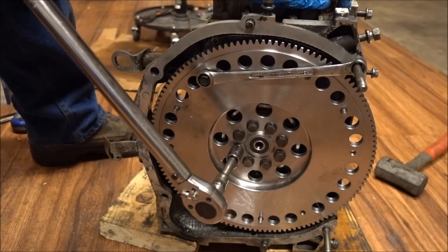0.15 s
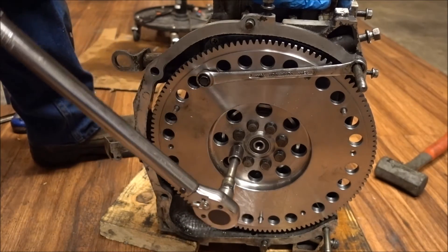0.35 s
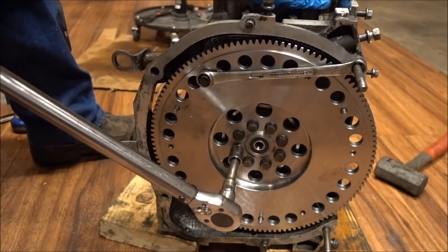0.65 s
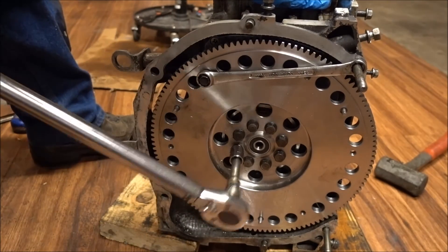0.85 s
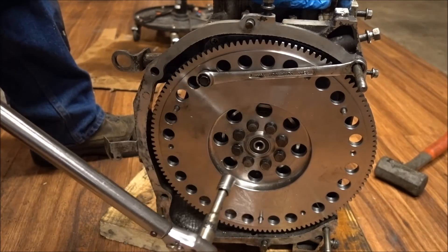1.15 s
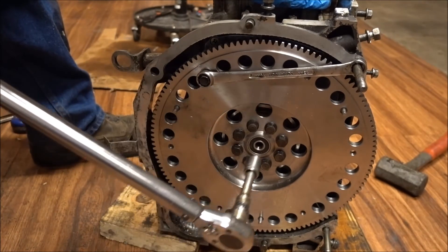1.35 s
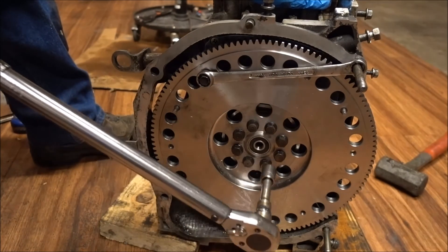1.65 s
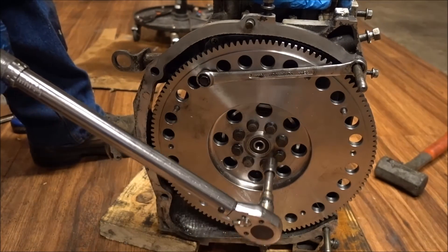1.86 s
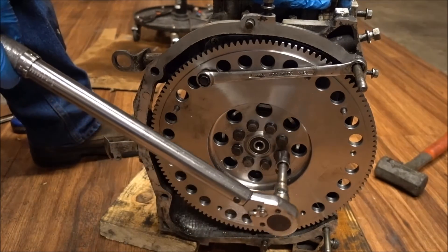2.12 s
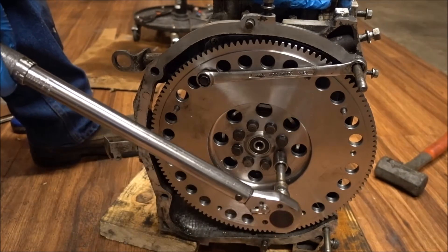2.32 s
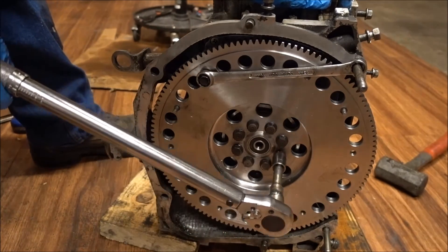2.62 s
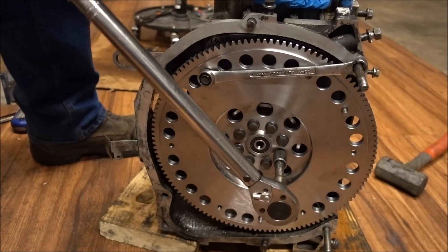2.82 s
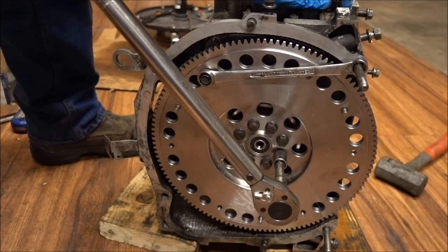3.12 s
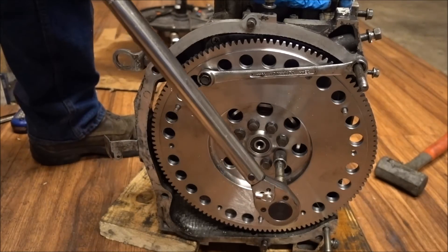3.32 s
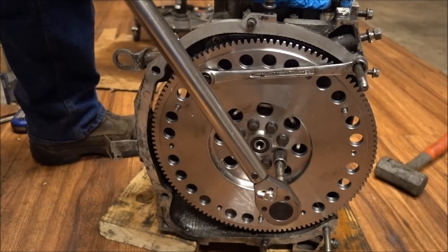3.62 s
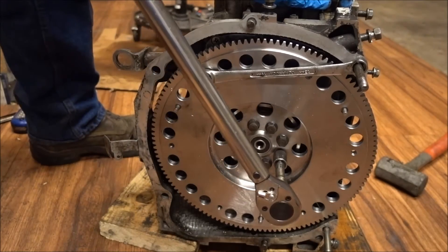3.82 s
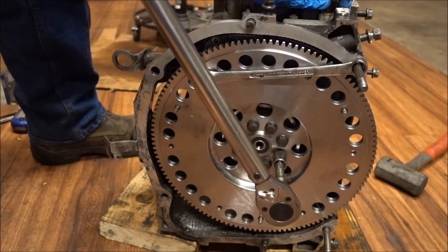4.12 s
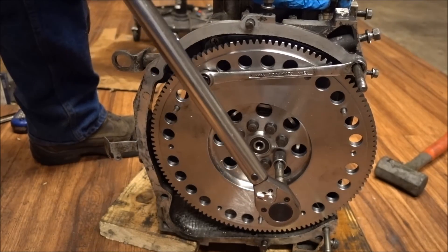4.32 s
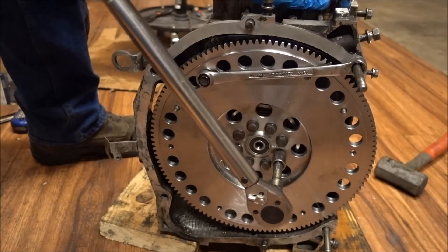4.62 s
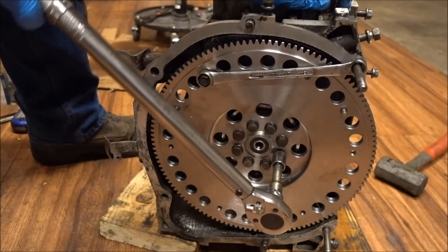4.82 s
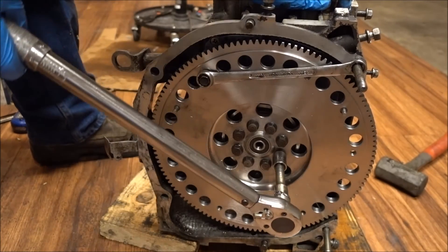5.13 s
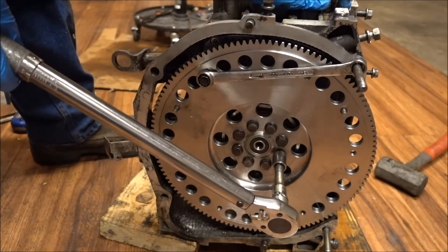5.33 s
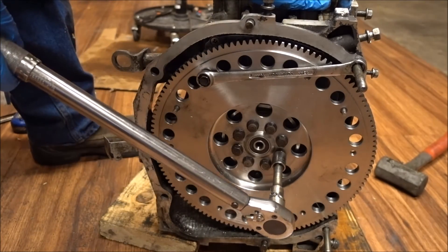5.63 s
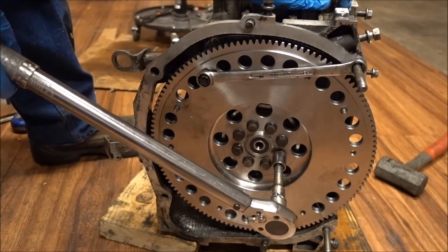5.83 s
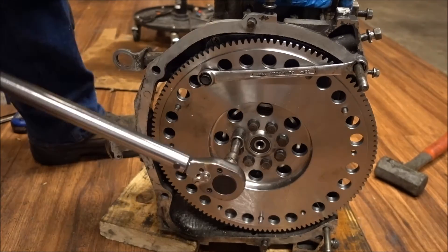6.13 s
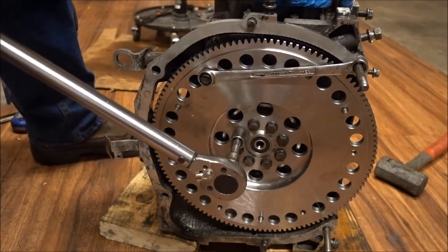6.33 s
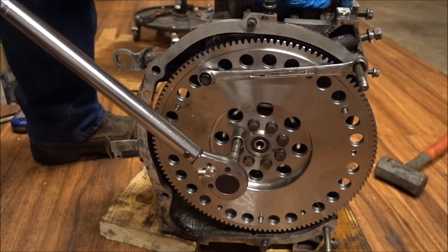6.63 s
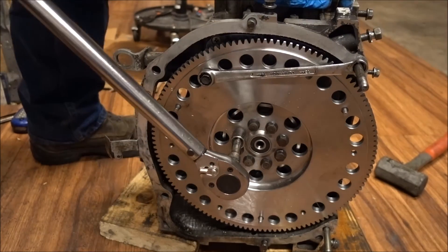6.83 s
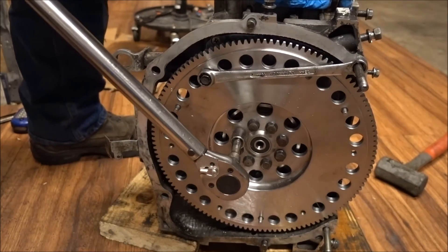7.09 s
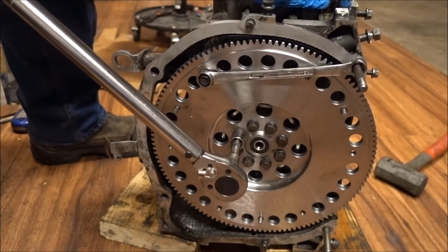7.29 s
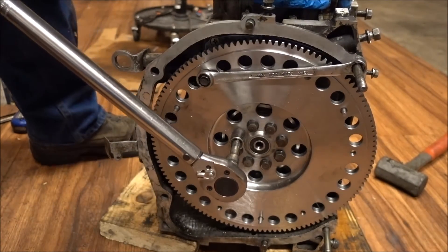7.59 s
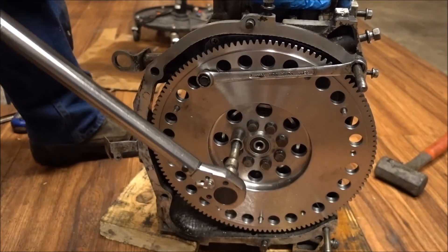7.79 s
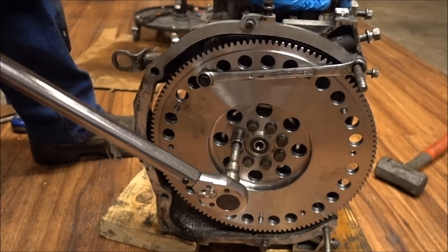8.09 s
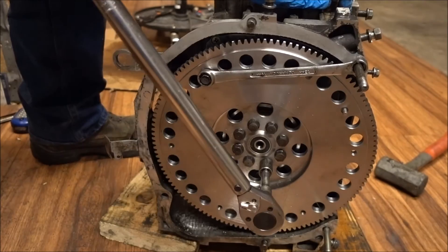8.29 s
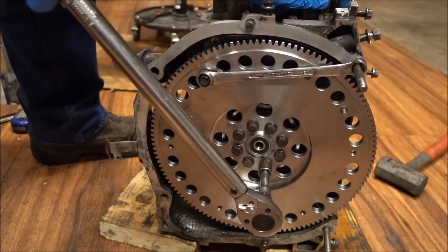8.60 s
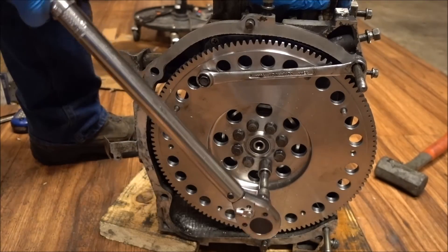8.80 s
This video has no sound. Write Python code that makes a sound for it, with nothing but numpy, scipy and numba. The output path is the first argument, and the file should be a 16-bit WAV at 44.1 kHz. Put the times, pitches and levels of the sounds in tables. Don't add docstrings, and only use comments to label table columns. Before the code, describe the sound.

Irregular metallic taps, a bright ringing clink, and three hard click-clack pairs from a torque wrench on an engine flywheel in a humming workshop.

```python
import sys
import numpy as np
from scipy import signal
from scipy.fft import rfft, irfft, next_fast_len
from scipy.io import wavfile
from scipy.ndimage import uniform_filter1d
from numba import njit

SR = 44100
rng = np.random.default_rng(int(sys.argv[2]) if len(sys.argv) > 2 else 0)


def transcribe(signal):
    frames = np.atleast_2d(signal).T
    limited = np.clip(frames, -1, 1)
    pcm = np.round(limited * 32767).astype(np.int16)
    wavfile.write(sys.argv[1], SR, pcm)


def rack_gain(trim_db):
    fader = np.asarray(trim_db, float)
    return 10 ** (fader / 20)


N = 394694

# (frequency [Hz], level [dB], t60 [s])
LEFTOVER = [(5916, -3, .8)]
NUDGE = [(3542, 0, .7), (10160, 2, .05), (1300, 2, .08)]
CLINK = [(797, -29, 5.0), (1502, -21, 1.5), (2299, -21, 0.4), (3106, -25, 0.25), (3542, -3, 0.64),
         (5149.8, -13, 0.4), (5157, -5, 0.36), (5916, -27, 0.99), (6745, -5, 0.2), (7095, -15, 0.4),
         (8312, -44, 0.43), (9065, -21, 0.38), (9141, -16, 0.67), (9889, -23, 0.32), (10160, -6, 0.27),
         (11070, -27, 0.25), (11940, -30, 0.56), (12670, -28, 0.23), (12850, -23, 0.3), (13030, -24, 0.36),
         (13740, -20, 0.14), (15140, -40, 0.23), (15570, -38, 0.35)]
TAP_1 = [(680, -6, 0.15), (1292, -6, 0.13), (3128, -6, 0.13), (3542, 0, 0.9), (5157, -5, 1.2),
         (5922, -19, 1.0), (6745, -14, 0.34), (7456, -37, 5.0), (9141, -24, 5.0), (10950, -25, 0.32),
         (12660, -17, 0.13)]
TAP_2 = [(199, -9, 0.17), (1502, -28, 0.96), (3542, 0, 0.63), (3811, -14, 0.27), (5922, -23, 0.6),
         (6740, -11, 0.31), (7456, -25, 0.55), (8947, -8, 0.19), (9141, -27, 0.73), (10160, -30, 0.45),
         (10950, -20, 0.24), (12650, -21, 0.23)]
TAP_3 = [(200, 0, .15), (680, 2, .15), (2550, 10, .035), (3542, -14, .5), (5157, -14, .25), (5922, -22, .4),
         (6745, -14, .25)]
SEAT = [(200, 4, .12), (680, 0, .15), (3542, -12, .6)]
BLIP = [(2550, 0, .035)]
SLIP = [(680, 0, .12), (1250, 0, .12), (1790, 3, .1), (3547, 0, .6), (5157, -3, .6)]
BREAK_1 = [(554, -12, 2.4), (697, -18, 0.3), (1087, -17, 2.2), (1206, -24, 0.4), (1486, -24, 2.8),
           (1626, -27, 5.0), (3273, -1, 0.18), (3546, 2.5, 0.36), (3559, -5, 0.25), (4899, -26, 0.82),
           (5157, -24, 0.97), (5916, -30, 2.0), (7058, -21, 0.4), (9146, -23, 0.63), (11110, -16, 0.61),
           (11950, -20, 0.13)]
RESET_1 = [(554, -5, 0.5), (697, -12, 0.2), (1206, 1, 0.25), (1637, -4, 0.22), (2293, -16, 0.32),
           (2900, -2, 0.13), (3138, -15, 0.38), (3548, -19, 0.45), (4183, -15, 0.31), (4565, -15, 0.75),
           (5157, -9, 0.75), (5916, -20, 0.6), (7477, -19, 0.4), (9146, -17, 0.88), (11110, -21, 0.38)]
BREAK_2 = [(554, -20, 5.0), (1087, -28, 5.0), (1836, -19, 0.31), (2293, -17, 0.67), (3305, -5, 0.2),
           (3548, -3, 0.5), (3560, -10, 0.3), (4172, -19, 0.27), (4899, -25, 0.58), (5157, -22, 0.56),
           (5922, -27, 1.0), (6821, -25, 0.32), (9146, -24, 0.85), (11110, -20, 0.16)]
RESET_2 = [(1087, -10, 0.3), (1486, -8, 0.7), (2536, -13, 0.3), (2767, -12, 0.3), (3327, -12, 0.3),
           (3550, -4, 0.35), (4404, -6, 0.22), (4565, -14, 0.75), (4960, -2, 0.22), (5135, -12, 0.3),
           (5157, -11, 0.38), (5916, -11, 0.45), (7127, -23, 0.56), (9082, -16, 0.44), (9146, -21, 0.75),
           (11110, -13, 0.41), (11620, -12, 0.13), (11940, -26, 0.4), (15580, -28, 0.23), (556, -12, .5),
           (1637, -3, .22)]
BREAK_3 = [(554, -21, 3.8), (1087, -15, 0.3), (1626, -34, 2.1), (2293, -29, 0.72), (3273, -15, 0.24),
           (3553, 0, 0.42), (4899, -27, 0.77), (5922, -25, 0.92), (7111, -19, 0.37), (9146, -25, 0.6),
           (11120, -47, 5.0), (14930, -36, 0.21), (15590, -40, 0.32)]
RESET_3 = [(554, -12, 0.5), (697, -20, 0.2), (1082, -19, 0.33), (3138, -17, 0.35), (3496, -14, 0.2),
           (3553, -2, 0.43), (4167, -17, 0.23), (4737, -18, 0.29), (5133, -15, 0.35), (5157, -12, 0.62),
           (5922, -28, 0.92), (7106, -24, 0.31), (9076, -25, 0.31), (10330, -31, 0.2), (12870, -36, 0.28),
           (14930, -42, 0.33), (15590, -27, 0.16), (1206, -8, .25), (1630, -11, .16)]

TAP, KNOCK, OVER, BACK, DULL, SKID = range(6)
TUBE, ALL = 1300, 20000
UNLIKE_HZ = 5000

# ((time [s], clatter level [dB], ring level [dB], contact [ms], muted at [s]),
#         modes, kind of contact, modes muted below [Hz])
BLOWS = [((.001, -90, -62, 1.1, .5), LEFTOVER, TAP, ALL), ((.7277, -21, -52, 1.5, .95), NUDGE, TAP, TUBE),
         ((.8385, -14.5, -52, 1.5, 1.01), NUDGE, TAP, ALL), ((1.016, 11, -6, 34.0, 1.9), CLINK, KNOCK, ALL),
         ((1.918, -14, -39, 2.5, 2.075), TAP_1, TAP, ALL), ((2.0755, -6, -30, 1.5, 2.277),
         TAP_2, TAP, TUBE), ((2.2832, -16, -38, 1.5, 2.6), TAP_3, DULL, ALL),
         ((2.6209, -34, -47, 2.5, 2.712), SEAT, DULL, ALL), ((2.709, -60, -42, 1.5, 2.8), BLIP, DULL, ALL),
         ((3.9414, 12, -17, 12.0, 4.188), BREAK_1, OVER, ALL), ((4.2018, 15, -17, 2.5, 4.395),
         RESET_1, BACK, TUBE), ((6.0975, -11, -46, 6.0, 6.188), SLIP, SKID, ALL),
         ((6.8284, 14, -12, 6.0, 7.149), BREAK_2, OVER, ALL), ((7.1596, 16.5, -17, 2.5, 7.27),
         RESET_2, BACK, TUBE), ((8.1908, 13, -11, 1.5, 8.45), BREAK_3, OVER, ALL),
         ((8.4562, 16, -11, 2.5, 8.635), RESET_3, BACK, TUBE)]


def wrench():
    # (frequency [Hz], level [dB])
    socket = [(100, -16), (200, -6), (700, -4), (1300, -1), (3500, 0), (6000, -6), (10000, -11),
              (15500, -19), (16500, -40)]
    dull_socket = [(100, -14), (200, -4), (700, -1), (1300, 0), (2600, 0), (4000, -6), (6000, -14),
                   (10000, -22), (16500, -45)]
    bar = [(200, -26), (600, -18), (1500, -7), (3500, 0), (7000, -1), (10000, -3), (13000, -6),
           (15500, -12), (16500, -40)]
    pawl_over = [(60, -17), (200, -8), (500, -12), (1000, -15), (1800, -1), (2500, -4), (3300, 0),
                 (4300, -3), (5300, -9), (7000, -8), (11000, -12), (15600, -16), (16500, -40)]
    pawl_back = [(60, -13), (110, -3), (300, -19), (800, -16), (1200, -7), (1620, -4), (2100, -6),
                 (3000, -1), (4500, -3), (6000, -6), (8000, -10), (15600, -19), (16500, -40)]
    # (frequency [Hz], width [Hz], level [dB])
    block_seated = [(200, 30, 1.2), (680, 70, 4), (1250, 70, 0), (1800, 110, 0), (2580, 100, 1),
                    (3130, 90, 3)]
    block_free = [(3130, 90, 2), (4220, 130, 2), (6900, 400, 3)]
    block_over = [(200, 30, 1), (700, 25, 8), (1210, 30, 3), (1840, 70, 3), (2150, 30, 6), (2400, 50, 5),
                  (2880, 80, 2), (3060, 30, 6), (3140, 30, 7), (3310, 35, 9), (4250, 120, 6),
                  (4900, 100, 0), (6900, 400, 3)]
    block_back = [(200, 30, -8), (694, 25, 10), (1090, 20, 6), (1210, 25, 6), (1640, 50, 8), (2550, 40, 6),
                  (2780, 30, 6), (2910, 30, 4), (3140, 35, 7), (3310, 35, 6), (3930, 35, 3), (4170, 30, 8),
                  (4390, 45, 5), (4900, 90, 3), (5560, 45, 1), (6900, 400, 2)]
    # (frequency [Hz], left leads [rad], left minus right [dB])
    lobes_seated = [(555, 0, 0), (1150, -.4, 1), (1490, -.1, -1), (2293, -.5, 0), (3548, .15, -1),
                    (5157, -1.6, 1), (5918, -.8, -1.5), (9144, -1.3, 0), (15000, -1.3, 0)]
    lobes_free = [(800, 0, 0), (1500, -.2, 0), (2299, -.6, -3), (3542, -.6, 9), (5157, -1.9, -4),
                  (5916, -.4, -2), (9141, -1.4, 0), (15000, -1.4, 0)]
    kinds = {TAP: (socket, -6, block_seated, lobes_seated),
             KNOCK: (bar, -33, block_free, lobes_free),
             OVER: (pawl_over, -23, block_over, lobes_seated),
             BACK: (pawl_back, -26, block_back, lobes_seated),
             DULL: (dull_socket, -8, block_seated, lobes_seated),
             SKID: (socket, -14, block_seated, lobes_seated)}
    hard_db = -25
    rattle_ms, rattle_share, rattle_db = 22, .012, -7

    cracks, clatter, rings = np.zeros((3, 2, N))
    for (s, clatter_db, ring_db, contact_ms, muted_s), modes, kind, muted_hz in BLOWS:
        colour, crack_db, clusters, lobes = kinds[kind]
        add(cracks, s, rack_gain(clatter_db + crack_db) * crack(min(contact_ms, 4.0), colour))

        push = shape(signal.unit_impulse(2048, 40), colour)
        struck_db = 1.5 * rng.standard_normal(len(clusters))
        push = push + sum(rack_gain(db + more) * band(push, hz, width)
                          for (hz, width, db), more in zip(clusters, struck_db))
        t = np.arange(4096) / SR
        hits = rng.standard_normal(len(t)) * (rng.random(len(t)) < rattle_share)
        rebounds = rack_gain(rattle_db) * hits * np.exp(-1e3 * t / rattle_ms)
        push = signal.fftconvolve(push, signal.unit_impulse(len(t)) + rebounds)
        add(clatter, s, rack_gain(clatter_db) * push / np.sqrt(np.sum(push ** 2)))

        sung = ring(modes, ring_db > hard_db, contact_ms, muted_s - s, muted_hz, lobes)
        add(rings, s, rack_gain(ring_db) * sung)
    return cracks, clatter, rings


def crack(contact_ms, colour):
    t = np.arange(2048) / SR
    burst = shape(rng.standard_normal(len(t)), colour) * np.exp(-1e3 * t / contact_ms)
    return burst / np.abs(burst).max()


def ring(modes, hard, contact_ms, free_s, muted_hz, lobes):
    hard_loss_db_per_s, hard_low_db = 20, -4.5
    tube_grow_ms = 30
    hz, db, t60 = np.array(modes, float).T
    loss_db_per_s = 60 / np.clip(t60, .03, 1.8) + hard * hard_loss_db_per_s * (t60 > .55)
    fade = rack_gain(-loss_db_per_s / SR)
    muted = fade * rack_gain(-2500 * (hz < muted_hz) / SR)

    start = np.pi * np.arange(len(hz))
    lobe_hz, lead, pan_db = np.transpose(lobes)
    scatter = .08 * rng.standard_normal(len(hz)) * hz / UNLIKE_HZ
    lead = np.interp(hz, lobe_hz, lead) / 2 + scatter
    pan_db = np.interp(hz, lobe_hz, pan_db) / 2
    level_db = db + hard * hard_low_db * (hz < 1550) + np.array([pan_db, -pan_db])
    size = rack_gain(level_db) * np.exp(1j * (start + np.array([lead, -lead])))
    size = size * np.abs(size).prod(axis=0) ** .5 / np.abs(size.mean(axis=0))

    grow_ms = contact_ms + hard * tube_grow_ms * (hz < TUBE)
    turn, grow = np.exp(2j * np.pi * hz / SR), np.exp(-1e3 / grow_ms / SR)
    return modal(np.zeros((2, SR)), turn, fade, size, grow, free_s * SR, muted)


@njit
def modal(out, turn, fade, size, grow, free, muted):
    for k in range(len(turn)):
        z, gap = 1 + 0j, 1.
        for i in range(out.shape[1]):
            z *= turn[k] * (fade[k] if i < free else muted[k])
            gap *= grow[k]
            out[0, i] += (1 - gap) * (size[0, k] * z).imag
            out[1, i] += (1 - gap) * (size[1, k] * z).imag
    return out


def ticks():
    # (time [s], peak level [dB], centre [Hz])
    drags = [(.8096, -44, 1800), (.8284, -28, 3400), (.9342, -42, 4000), (.9527, -28, 3300),
             (.958, -29, 3560), (.9674, -31, 3630), (.9754, -29, 2740), (8.9326, -33, 3180)]
    bounces = [(.7222, -44, 2800), (.8407, -27, 4000), (1.9235, -24, 3150), (1.926, -26, 3300),
               (2.0772, -16, 4500), (2.0824, -25, 3540), (2.0885, -25, 3000), (2.2714, -32, 3540),
               (2.2777, -25, 2600), (4.1748, -29, 2700), (6.0866, -33, 3560), (6.0995, -29, 4200),
               (6.1022, -27, 3600), (6.1068, -28, 1900), (6.135, -36, 2200), (7.1437, -30, 2400)]
    loose_parts = [(4.3844, -36, 2750), (4.6921, -49, 4000), (5.3944, -54, 9000), (6.1844, -44, 2500),
                   (6.574, -46, 5000), (6.6956, -48, 3000), (7.5344, -51, 5000), (7.7518, -43, 3700),
                   (7.7638, -41, 2360), (8.0586, -48, 6000), (8.6244, -40, 2750)]
    shoes = [(.19, -54, 700), (.197, -47, 1000), (.213, -47, 1300), (.221, -45, 950), (.245, -53, 900),
             (4.43, -52, 500), (4.562, -50, 500), (4.572, -47, 2300), (4.576, -45, 1500), (4.586, -50, 800),
             (4.593, -51, 1100), (6.64, -51, 400), (7.7253, -46, 300)]
    rim_rebounds = [(4.2022, -11, 2920), (6.8383, -13, 3540), (6.864, -13, 3000), (6.8717, -12, 3550),
                    (6.886, -14, 2500), (8.4778, -10, 3550)]
    # (touches, thud against click dB, treble dB, contact ms)
    groups = [(drags, -26, -7, 2.3), (bounces, -21, -6, 2.6), (loose_parts, -12, 1.5, 3.0),
              (shoes, 0, -16, 6.0), (rim_rebounds, -34, 0, 1.5)]
    out = np.zeros((2, N))
    for touches, thud_db, treble_db, contact_ms in groups:
        for s, db, hz in touches:
            colour = [(hz / 8, -26), (hz / 1.3, -9), (hz, 0), (hz * 1.3, -9),
                      (15800, treble_db - 24), (16500, -60)]
            click = crack(contact_ms, colour)
            thud = band(crack(6.0, [(100, 0), (800, -4), (1600, -30)]), 250, 300)
            add(out, s, rack_gain(db) * (click + rack_gain(thud_db + 3) * thud))
    return out


def whistle():
    # (time [s], frequency [Hz], level [dB])
    slide = [
        (2.62, 8000, -90),
        (2.65, 8500, -74),
        (2.675, 8900, -66),
        (2.71, 8980, -64),
        (2.722, 8980, -90),
    ]
    s, hz, db = np.transpose(slide)
    t = np.arange(N) / SR
    phase = 2 * np.pi * np.cumsum(np.interp(t, s, hz)) / SR
    tones = np.sin(phase) + rack_gain(-3) * np.sin(1.058 * phase)
    return rack_gain(np.interp(t, s, db, left=-120, right=-120)) * tones


def rustle():
    # (loudest at [s], level [dB], rise [s], fall [s])
    movements = [(.4, -63, .35, .6), (1.68, -66, .25, .45), (2.75, -65, .06, .8), (4.57, -66, .14, 1.6),
                 (6.45, -69, .5, .4), (6.57, -63, .2, .25), (7.55, -66, .9, .6), (7.77, -58, .12, .14),
                 (8.07, -64, .25, .45), (8.8, -68, .6, .6)]
    # (frequency [Hz], level [dB])
    cloth = [(150, -8), (500, 0), (1200, 1), (2500, 1.5), (6000, -5), (12000, -9), (15800, -14),
             (16200, -40)]
    range_db = 15
    t = np.arange(N) / SR
    moves = sum(rack_gain(db - range_db * np.maximum((s - t) / rise_s, (t - s) / fall_s))
                for s, db, rise_s, fall_s in movements)
    grains = rng.standard_normal((2, N)) * rack_gain(2.5 * walk(60))
    return moves * rack_gain(3.0) * unit(shape(pair(grains, 4000), cloth))


def hum():
    # (frequency [Hz], level [dB])
    mid_colour = [(20, -6), (38, -10), (58, 1), (90, -4.5), (125, -.5), (165, -9), (300, -16), (500, -21),
                  (900, -18), (1300, -24), (2300, -23), (3300, -30), (15600, -34.5), (16100, -55)]
    side_colour = [(20, 8), (200, 6), (500, 0), (900, 2), (2200, 2), (4000, -6), (15600, -11), (16100, -32)]
    # (centre [Hz], width [Hz], level [dB])
    fan_bands = [(840, 200, -75), (2080, 130, -71.5)]
    mid_db, side_db = -57, -67.5
    mid, side = rng.standard_normal((2, N))
    mid = rack_gain(mid_db) * unit(shape(mid, mid_colour))
    bass = shape(mid, [(300, 0), (600, -40)])
    mid = mid + bass * (rack_gain(2.0 * walk(1.5) + 2.0 * walk(12)) - 1)
    fan = sum(rack_gain(db + 1.5 * walk(3)) * unit(band(rng.standard_normal(N), hz, width))
              for hz, width, db in fan_bands)
    return mid + fan + np.array([[1], [-1]]) * rack_gain(side_db) * unit(shape(side, side_colour))


def room():
    # (centre [Hz], t60 [s], level [dB])
    octaves = [(125, .5, -3), (250, .45, -2), (500, .4, 0), (1000, .37, 0), (2000, .37, 0), (4000, .36, 0),
               (8000, .32, 1), (15000, .24, 0)]
    first_wall_s = .002
    t, out = np.arange(SR // 4 * 3) / SR, 0
    for hz, t60, db in octaves:
        colour = [(hz / 2, -40), (hz / 1.4, -3), (hz, 0), (hz * 1.4, -3), (hz * 2, -40)]
        octave = shape(rng.standard_normal((2, len(t))), colour)
        out = out + rack_gain(db - 60 * t / t60) * pair(octave, hz) / np.sqrt(t60)
    out = out * np.clip(t / first_wall_s - 1, 0, 1)
    return out / np.sqrt(np.sum(out ** 2) / 2)


def shape(x, table):
    hz, db = np.transpose(table)
    size = next_fast_len(x.shape[-1])
    f = np.log(np.fft.rfftfreq(size, 1 / SR) + 1)
    gain = rack_gain(np.interp(f, np.log(hz), db))
    return irfft(rfft(x, size) * gain, size)[..., :x.shape[-1]]


def unit(x):
    return x / np.sqrt(np.mean(x ** 2))


def band(x, hz, width):
    return signal.lfilter(*signal.iirpeak(min(hz, .45 * SR), hz / width, SR), x)


def add(out, s, x):
    i = int(s * SR)
    out[:, i:i + x.shape[-1]] += x[..., :N - i]


def walk(rate):
    k = int(SR / rate)
    steps = np.repeat(rng.standard_normal(N // k + 1), k)
    return uniform_filter1d(uniform_filter1d(steps, k), k)[:N]


def pair(noise, hz):
    return noise[0] + np.array([[1], [-1]]) * min(.05 + hz / UNLIKE_HZ, 1) * noise[1]


def scene():
    changes_s = [2.72, 6.188]
    tick_wet_db, ring_wet_db = -2, -13
    cracks, clatter, rings = wrench()
    touches = ticks()
    cuts = [int(s * SR) for s in changes_s]
    for i in cuts:
        rings[:, i:i + SR // 2] = 0
    sent = clatter + rack_gain(tick_wet_db) * touches + rack_gain(ring_wet_db) * rings
    walls = room()
    parts = np.split(sent[:1], cuts, axis=1)
    echoes = np.hstack([signal.oaconvolve(part, walls, axes=1)[:, :part.shape[1]] for part in parts])
    return cracks + touches + rings + echoes + rustle() + whistle() + hum()


@njit
def follow(x, attack, release):
    out, e = np.empty(len(x)), 0.
    for i in range(len(x)):
        e += (x[i] - e) * (attack if x[i] > e else release)
        out[i] = e
    return out


def roll_off(x):
    return signal.sosfilt(signal.butter(12, 17140, fs=SR, output="sos"), x)


def record(dry):
    limit_db, attack_s, release_s, ahead_s = -11.5, .0005, .045, .001
    level = follow(np.abs(dry).max(axis=0), 1 / (attack_s * SR), 1 / (release_s * SR))
    ahead = np.roll(level, -int(ahead_s * SR))
    held = dry * np.minimum(1, rack_gain(limit_db) / (ahead + 1e-9))
    soft = np.tanh(1.2 * held) / 1.2
    lowpass = signal.ellip(8, .2, 60, 16500, fs=SR, output="sos")
    return roll_off(signal.sosfilt(lowpass, soft))


dry = scene()
out = record(dry)
transcribe(out)
```